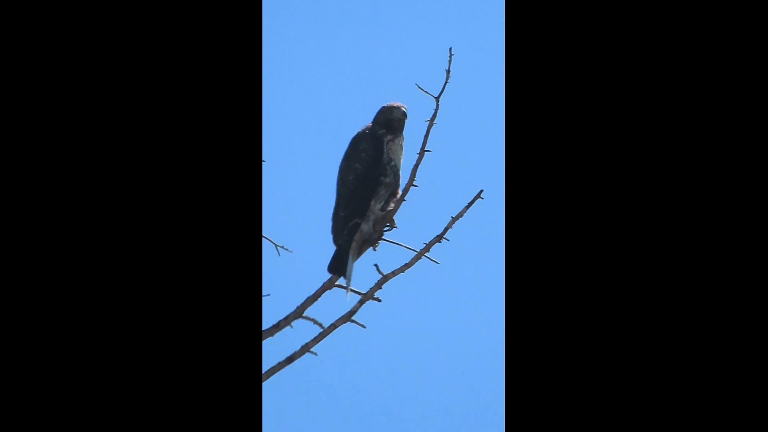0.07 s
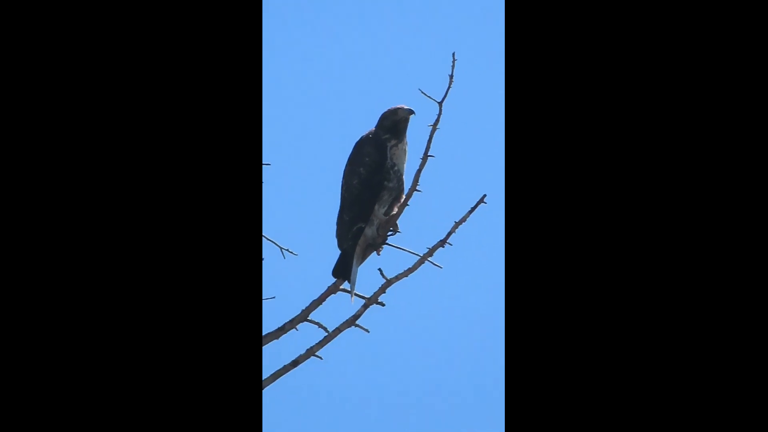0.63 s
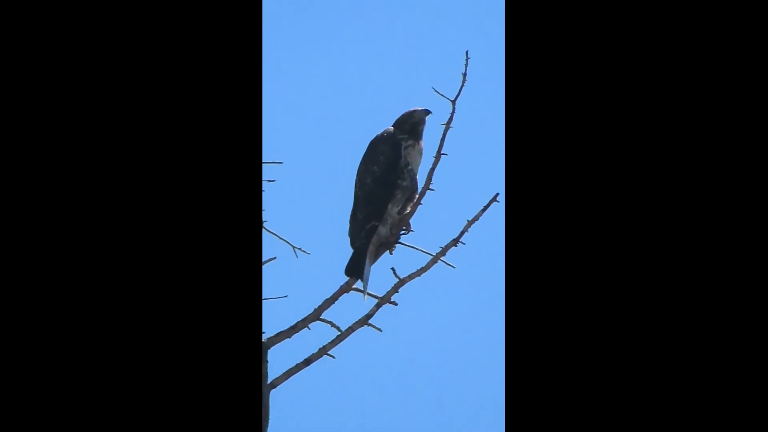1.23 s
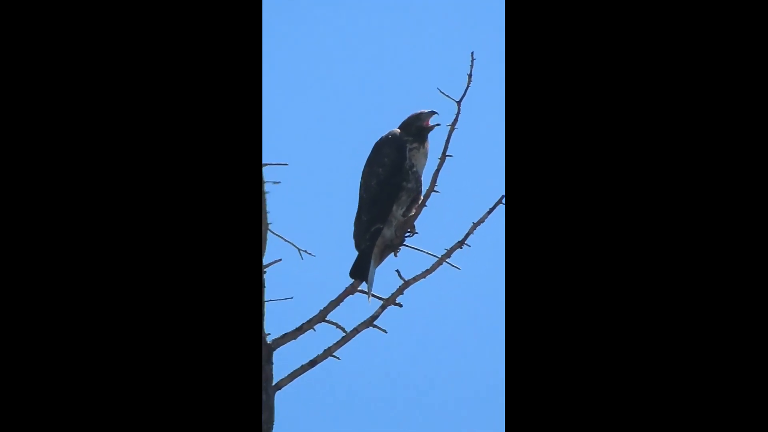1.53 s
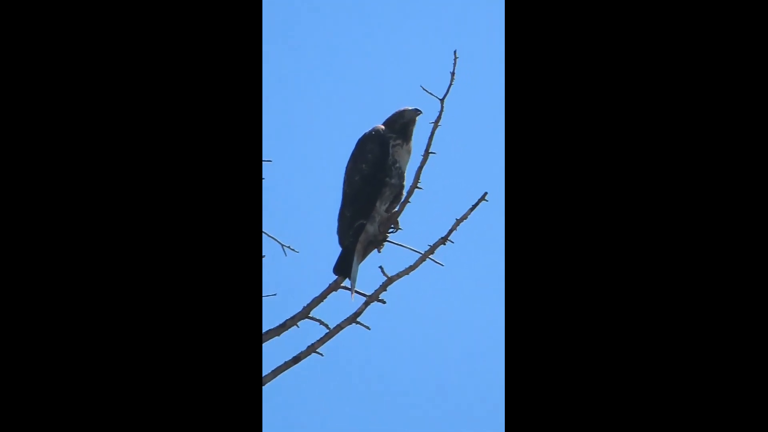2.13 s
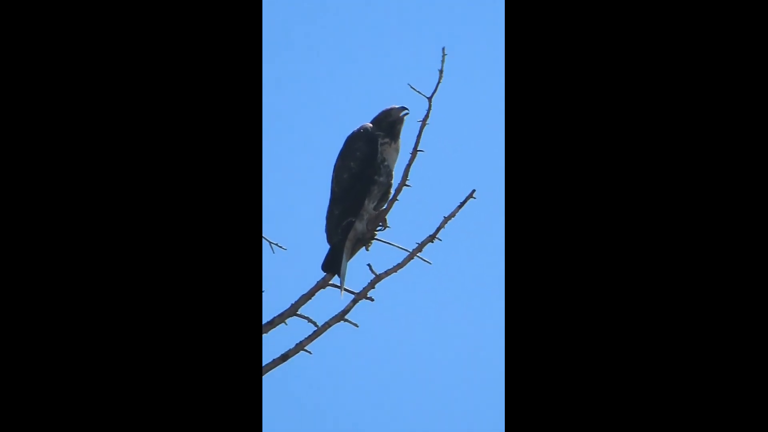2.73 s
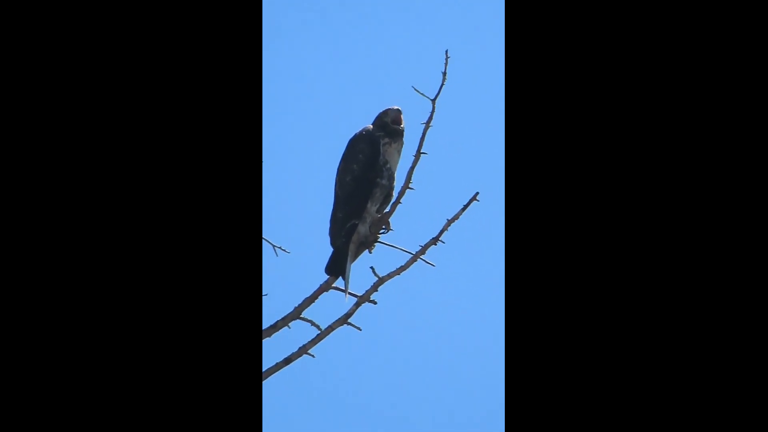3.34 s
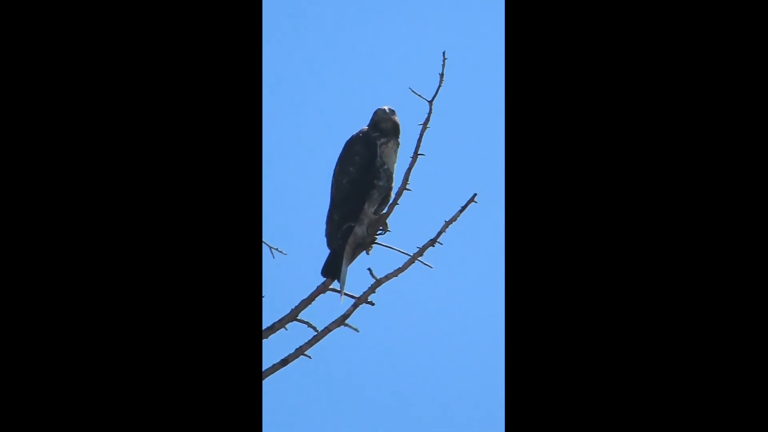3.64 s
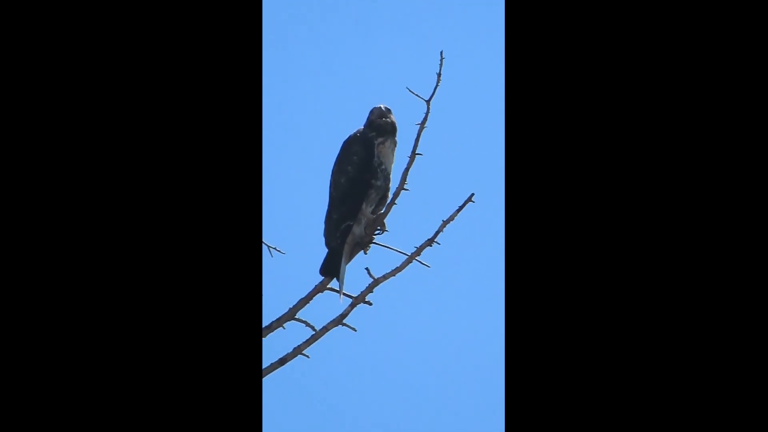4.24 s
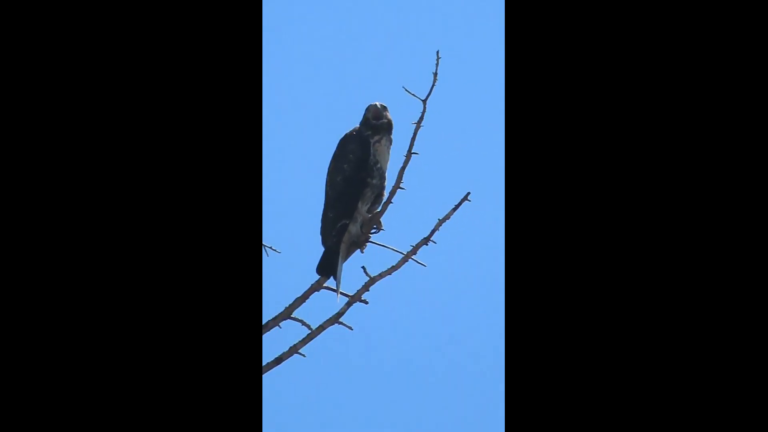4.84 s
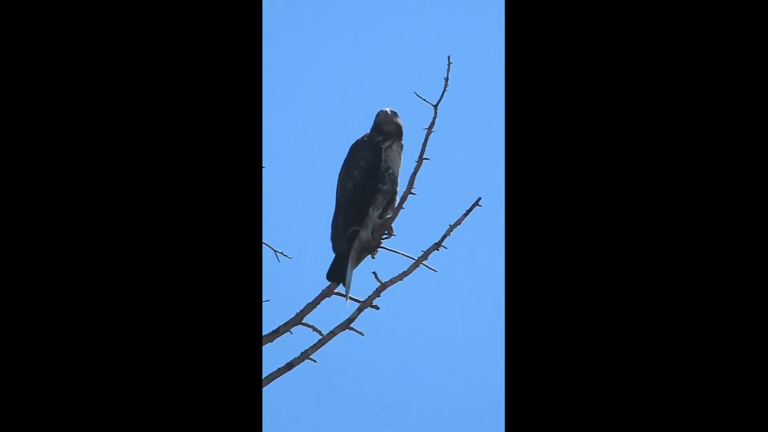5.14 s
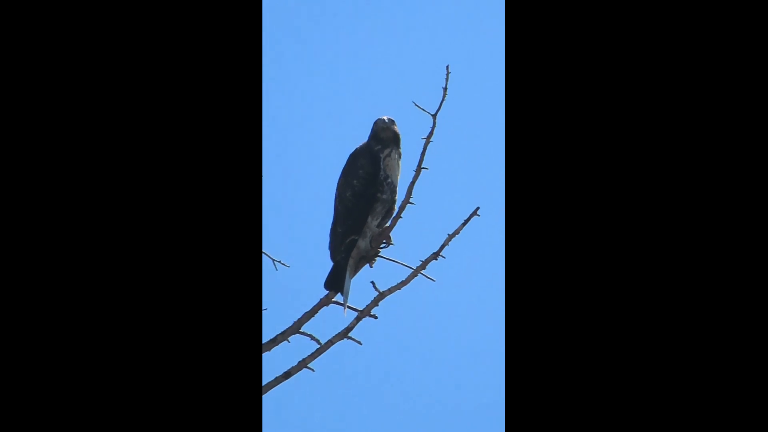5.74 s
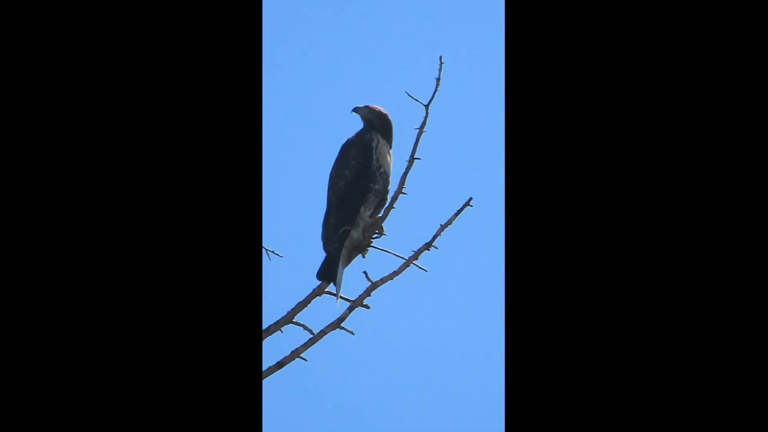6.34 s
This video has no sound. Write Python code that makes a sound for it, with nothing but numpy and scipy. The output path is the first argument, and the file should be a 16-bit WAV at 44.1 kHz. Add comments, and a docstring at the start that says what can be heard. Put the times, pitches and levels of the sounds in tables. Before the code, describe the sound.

Two young hawks trade high squeals and lower rising cries outdoors, while light wind rumbles and bumps the microphone.

```python
"""Light wind bumps the microphone, a small bird gives one thin far call, and two young hawks beg.
The near hawk squeals high; the other answers about an octave lower, over a quiet outdoor wash.
Their cries are whistles from the syrinx, most of them breaking from one register into the next,
and trees scatter them back. The wind is turbulence at the two microphone ports."""
import sys
import numpy as np
from scipy import signal
from scipy.fft import rfft, irfft
from scipy.io import wavfile
from scipy.ndimage import uniform_filter1d

SR = 44100
rng = np.random.default_rng(int(sys.argv[2]) if len(sys.argv) > 2 else 0)


def materialize(psi):
    """Save the field psi as 16-bit PCM at rate SR to the path in sys.argv[1].

    A 1-D psi becomes a single channel; in a 2-D psi each row is a channel.
    """
    bounded = np.clip(np.atleast_2d(psi).T, -1, 1)
    quanta = np.round(bounded * 32767).astype(np.int16)
    wavfile.write(sys.argv[1], SR, quanta)


N = 285768
CLEAN_DB = -48  # side tone of a clear voice, relative to its whistle


def high_hawk(run_up_ratio=.6, middle_hz=3148, yelp_ratio=.688, sag_s=.015):
    """The near hawk runs up, breaks into a middle register, again into its squeal, and ends on a yelp."""
    # the held top register, one contour per cry: time_s, pitch_hz, level_db
    squeals = [
        [(0.988, 3450, -59), (1.0, 3740, -54), (1.02, 3953, -46), (1.046, 4012, -45), (1.166, 3970, -37),
         (1.214, 4060, -45.5), (1.224, 4060, -38), (1.297, 4110, -42)],
        [(1.908, 4306, -41.5), (1.956, 4286, -46.5), (1.972, 4293, -37), (1.99, 4320, -45),
         (2.054, 4360, -41.5), (2.068, 4347, -42), (2.082, 4375, -56), (2.119, 4244, -39)],
        [(2.646, 4340, -47), (2.702, 4315, -43.5), (2.768, 4407, -40.5), (2.832, 4394, -36), (2.848, 4415, -53),
         (2.858, 4400, -37), (2.88, 4200, -47)],
        [(3.403, 4297, -38.5), (3.497, 4240, -41.5), (3.539, 4212, -50.5), (3.551, 4271, -37.5),
         (3.589, 4277, -35), (3.609, 4286, -42), (3.645, 4240, -37.5), (3.668, 4140, -39.5)],
        [(4.144, 4110, -44), (4.16, 4180, -38.5), (4.182, 4220, -38.5), (4.286, 4160, -33.5),
         (4.386, 4198, -36), (4.398, 4163, -32), (4.43, 4126, -41), (4.46, 4045, -41.5)],
        [(5.003, 4100, -42), (5.007, 4140, -39.5), (5.111, 4084, -34.5), (5.215, 4156, -35.5),
         (5.223, 4132, -39.5), (5.255, 4120, -39), (5.275, 4027, -37)],
    ]
    # into and out of each squeal: run_up_start_s, middle_start_s, lead_in_db, yelp_db, side_tone_db
    transitions = [(0, 0, -60, -45.5, -21.5), (1.812, 1.856, -39, -39.5, -7.5),
                   (2.552, 2.585, -37, -38, -13.5), (3.33, 3.363, -38.5, -39, -23),
                   (4.108, 4.139, -39, -45.5, -42), (4.93, 4.974, -40, -58, -45)]
    # overtones beam from the bill and grow as the bird faces the microphone: time_s, brightness_db
    facing = [(1.1, -4.5), (2.0, 0), (2.75, -3), (3.5, 4), (4.3, -2.5), (5.1, 0.5)]
    notes = []
    for squeal, (run_up, middle, lead_db, yelp_db, side_db) in zip(squeals, transitions):
        start, first_hz, _ = squeal[0]
        end, last_hz, last_db = squeal[-1]
        if run_up > 0:  # the first cry starts straight on the squeal
            notes.append(note(run_up, middle - run_up, run_up_ratio * first_hz, lead_db, scoop=.0387,
                              scoop_s=.022, climb=.125, bend=.032, bend_s=.006, soft_db=-17, swell_db=6.5))
            notes.append(note(middle, start - middle, middle_hz, lead_db - .5,
                              climb=.018, bend=.065, bend_s=.0037, swell_db=-3.5, release_db=-7))
        sag = (end + sag_s, last_hz * (1 - .018), last_db - 2.5)  # just before the squeal drops out
        notes.append([(*point, side_db) for point in [*squeal, sag]])
        notes.append(note(end + sag_s, .022, yelp_ratio * last_hz, yelp_db,
                          climb=-.039, bend=-.039, bend_s=.0094, release_db=-11.5))
    voice = whistles(notes, facing, side_ratio=3 / 5, jitter=.0021, shimmer_db=.7, side_rough=.74)
    placed = trees(voice, wet_db=-6.5, near_t60=.92, far_db=-11, far_t60=.91, echo_db=-6, spread=.29)
    return placed * gain_of([[-.2], [.1]])


def low_hawk(rasp_db=.5):
    """The other hawk's rising cry sags away when weak; pressed harder, it breaks into a higher register."""
    # one cry a row, the rising note and then the upper register (end 0 if the voice does not break):
    # start_s, end_s, top_hz, level_db, swell_db, upper_end_s, upper_base_hz, crest_rise_hz, upper_db
    cries = [(2.493, 2.863, 2144, -47.5, -2.5, 0, 0, 0, -60),
             (3.127, 3.384, 2264, -36.5, 12.5, 0, 0, -2, -60), (3.657, 3.907, 2302, -37.5, 6, 0, 0, 0, -60),
             (4.15, 4.332, 2373, -37, 7.5, 4.39, 2891, -42, -40.5),
             (4.647, 4.822, 2379, -36.5, 4, 5, 2867.5, 71, -42.5),
             (5.171, 5.294, 2423, -35.5, 3, 5.5, 2834, 103.5, -34.5),
             (5.694, 5.794, 2446, -34.5, 3, 6, 2855.5, 160.5, -34),
             (6.234, 6.343, 2435, -38.5, 0, 6.5, 2815, 184, -39)]
    # the bill turning toward and away from the microphone: time_s, brightness_db
    facing = [(3.3, -2.5), (4.75, -0.99), (5.8, -1.7)]
    notes = []
    for start, end, hz, db, swell_db, upper_end, base_hz, crest_hz, upper_db in cries:
        if upper_end > end:
            notes.append(note(start, end - start, hz, db, scoop=.135, scoop_s=.026, climb=.06, bend=.031,
                              bend_s=.0096, soft_db=-29.5, swell_db=swell_db, rasp_db=rasp_db))
            notes.append(upper_register(end, upper_end, base_hz, crest_hz, upper_db))
        else:
            notes.append(note(start, end - start, hz, db, scoop=.115, scoop_s=.031, climb=.07,
                              bend=-.12, bend_s=.01866, soft_db=-16, swell_db=swell_db,
                              release_db=-15.5, rasp_db=rasp_db))
    voice = whistles(notes, facing, side_ratio=3 / 2, jitter=.0033, shimmer_db=1.54, side_rough=.36)
    placed = trees(voice, wet_db=-6.5, near_t60=.47, far_db=-5.5, far_t60=1.23, echo_db=-2, spread=.22)
    return placed * gain_of([[-.5], [.4]])


def upper_register(start, end, base_hz, crest_hz, db, crest_db=-7, fall_s=.034, fall_hz=270, fall_db=-5.5):
    """The upper note starts level, arches, then slides down; a ground reflection dims it near its crest."""
    s = np.linspace(start, end, num=80)
    through = (s - start) / (end - start)
    crest = np.exp(-((through - .64) / .2) ** 2)
    fall = np.maximum(1 - (end - s) / fall_s, 0)
    pitch = base_hz + crest_hz * crest - fall_hz * fall
    level = db + crest_db * crest + fall_db * fall ** 2
    return np.transpose([s, pitch, level, np.full_like(s, CLEAN_DB)])


def note(start, length, hz, db, scoop=0, scoop_s=.02, climb=0, bend=0, bend_s=.01,
         soft_db=0, swell_db=0, release_db=0, rasp_db=CLEAN_DB):
    """One register: the pitch scoops in, climbs with the pressure and bends at the end, by shares of hz."""
    t = np.linspace(0, length, num=80)
    through = t / length
    onset, ending = np.exp(-t / scoop_s), np.exp((t - length) / bend_s)
    pitch = hz * (1 - scoop * onset - climb * (1 - through) + bend * ending)
    level = db + soft_db * onset ** 2 + swell_db * (through - .5) + release_db * ending
    side_db = np.maximum(rasp_db - 580 * t, CLEAN_DB)  # a raspy attack clears at 580 dB a second
    return np.transpose([start + t, pitch, level, side_db])


def whistles(notes, facing, side_ratio, jitter, shimmer_db, side_rough, press_db=3, patchy_db=3):
    """The syrinx sings a nearly pure tone with faint harmonics and a rough side tone that tracks it."""
    # higher whistles are purer: pitch_hz, step_per_harmonic_db
    purity = [(1800, -9.5), (2200, -12), (2500, -20), (3000, -24.5), (4200, -24.5)]
    # the throat damps overtones beyond the second harmonic: gain_db for harmonics 1 to 4
    throat = [0, 1, -4, -5.5]
    out = np.zeros(N)
    waver, flutter, slip, patches = (wander(N, hz) for hz in (260, 110, 140, 24))
    for contour in notes:  # rows of time_s, pitch_hz, level_db, side_tone_db
        s, *columns = np.transpose(contour)
        at = np.arange(max(round(s[0] * SR), 0), min(round(s[-1] * SR), N))
        hz, db, side_db = (np.interp(at / SR, s, column) for column in columns)
        phase = 2 * np.pi * np.cumsum(hz * (1 + jitter * waver[at])) / SR
        # brighter while the bird presses the pitch up, duller as it lets go
        pitch_slope = np.gradient(np.log(hz)) * SR
        pressing = np.tanh(uniform_filter1d(pitch_slope, size=600) / 2)
        facing_db = np.interp(at / SR, *np.transpose(facing))
        rolloff = gain_of(curve_at(purity, hz) + facing_db + press_db * pressing)
        tone = sum(gain_of(trim) * rolloff ** k * np.sin((k + 1) * phase) for k, trim in enumerate(throat))
        # the side tone slips in and out of step and beats with the whistle, adding their sum tone
        side_phase = side_ratio * phase + side_rough * slip[at]
        side_tone = np.sin(side_phase) + gain_of(-23.5) * np.sin(side_phase + phase)
        tone += gain_of(side_db + patchy_db * patches[at]) * side_tone
        t = np.arange(len(at)) / SR
        edge = np.clip(np.minimum(t / .003, t[::-1] / .005), 0, 1)
        fade = np.sin(np.pi / 2 * edge) ** 2
        add(out, s[0], np.sqrt(2) * gain_of(db + shimmer_db * flutter[at]) * fade * tone)
    return out


def small_bird():
    """One thin, slightly falling whistle from far off in the trees."""
    # the bill holds one direction: time_s, brightness_db
    facing = [(0, -6)]
    call = note(start=.015, length=.2, hz=6900, db=-73, scoop=-.0194, climb=-.06, swell_db=-4)
    voice = whistles([call], facing, side_ratio=1 / 2, jitter=.012, shimmer_db=2, side_rough=.3)
    return trees(voice, wet_db=-1, near_t60=.62, far_db=-20, far_t60=.9, echo_db=-1.5, spread=.6)


def trees(voice, wet_db, near_t60, far_db, far_t60, echo_db, spread):
    """A few distinct echoes, a tail from near foliage and a fainter one from the woods behind."""
    # slaps off single trunks and the ground: delay_s, relative_level_db
    echoes = [(0.021, -21.5), (0.046, -23.5), (.072, -13), (.103, -44), (0.137, -26.5)]
    t = np.arange(SR) / SR
    scatter = rng.standard_normal((2, SR)) * (rng.random((2, SR)) < 1500 / SR)  # about 1500 a second
    decay = np.hypot(gain_of(-60 * t / near_t60), gain_of(far_db - 60 * t / far_t60))
    mid, side = scatter * decay * (1 - np.exp(-t / .0032))
    tail = np.array([mid + spread * side, mid - spread * side])
    tail *= gain_of(wet_db) / np.linalg.norm(tail[0])
    for delay, db in echoes:
        tail[:, round(delay * SR)] += gain_of(db + echo_db)
    return voice + signal.fftconvolve(voice[None], tail, axes=1)[:, :N]


def buffets(glide=.208, port_lag_s=.00064, rough=.38):
    """Each eddy thumps: a pressure swing of a few quickening, steep-sided cycles, unlike at each port."""
    # eddies hitting the microphone:
    # centre_s, peak_db, ring_hz, half_length_s, left_minus_right_db, steepening_db
    eddies = [(0.047, -27.5, 201.2, 0.012, 5, -10.5), (.213, -28, 210, .006, 1, -21),
              (.285, -23, 201, 0.0052, -5, -15), (0.347, -28, 230, 0.0076, -3, -17),
              (0.373, -23, 164, 0.0061, 0, -21), (0.509, -17.5, 143.7, 0.0057, -1.5, -8),
              (0.903, -34, 75, .01, 0, -15), (1.171, -27, 60.3, 0.021, 0, -5),
              (1.189, -24.5, 218.2, .008, 7, -9.5), (2.092, -15.5, 243.4, .007, -5.5, -9),
              (2.346, -31, 195, 0.0059, -4.5, -11), (2.446, -26.5, 66, 0.011, -1, -11),
              (2.693, -29, 114, 0.0055, 0, -15), (2.811, -28.5, 86, 0.02, 1, -5),
              (2.89, -27, 102, 0.017, 4, -15), (3.5, -23.5, 130, .006, -3, -9),
              (3.546, -28, 109, .007, 6, -20), (3.595, -20.5, 131.7, 0.0074, 6, -10),
              (3.793, -16.5, 99.4, 0.00551, -2, -13), (4.25, -12.5, 109.1, 0.012, -2, -13),
              (4.317, -15, 87.6, 0.0093, 4, -9), (4.354, -14, 173.6, 0.011, 0.5, -27),
              (5.258, -31, 74, .01, -5, -12), (5.765, -29, 151, .008, -0.5, -18),
              (5.814, -26.5, 93.5, .012, 2, -12.5), (6.339, -24, 86.8, 0.0083, 0, -12)]
    out, grain = np.zeros((2, N)), wander(N, 191)
    for s, db, hz, half_s, pan_db, steep_db in eddies:
        turn, heading = rng.random(2)
        u = np.arange(-5 * half_s, 5 * half_s, 1 / SR) / half_s  # half lengths from the centre
        phase = 2 * np.pi * (np.cumsum(hz * np.exp(glide * np.tanh(u))) / SR + turn)
        shape = signal.windows.tukey(len(u), .5) / np.cosh(np.pi / 2 * u)
        swell = gain_of(db) * shape * (1 + rough * grain[round(s * SR):][:len(u)])
        port_phase = np.sign(heading - .5) * 2 * np.pi * hz * port_lag_s  # it reaches one port first
        start = s + u[0] * half_s
        skip = max(round(-start * SR), 0)
        for port, sign in zip(out, (1, -1)):
            swing = phase + sign * port_phase
            steepened = np.sin(swing + 2 * gain_of(steep_db) * shape * np.sin(swing))
            thump = swell * steepened * gain_of(sign * pan_db / 2)
            add(port, start, thump[skip:])
    return out


def wind(lumpy_db=1):
    """Turbulence at the microphone ports rumbles and swells with the breeze."""
    # strength of the breeze, capped below: time_s, level_db
    breeze = [(0.0, -45), (0.05, -40.5), (0.43, -43), (0.5, -24), (0.56, -44), (1.84, -51.5), (2.06, -39.5),
              (2.54, -40), (2.65, -51), (2.89, -31.5), (3.07, -49.5), (3.59, -37.5), (3.63, -42.5),
              (3.79, -37.5), (4.0, -46), (4.2, -42), (4.24, -24), (4.33, -33), (4.55, -59), (5.03, -38),
              (5.05, -50), (5.27, -41), (5.31, -52), (5.74, -43), (5.81, -34), (5.87, -48), (6.04, -51.5),
              (6.08, -38), (6.26, -54), (6.33, -35.5), (6.44, -47), (6.48, -36)]
    # colour of the turbulence: frequency_hz, density_db
    spectrum = [(12, 0.5), (35, 0), (80, 3.5), (130, -4.5), (200, -13), (300, -27), (500, -38.5),
                (1000, -70)]
    rumble = noise_pair(spectrum, likeness=[(30, 1), (80, .93), (160, .44), (400, .28)])
    breeze_db = np.minimum(np.interp(np.arange(N) / SR, *np.transpose(breeze)), -35.5)
    return rumble * gain_of(breeze_db + 2.5 + lumpy_db * wander(N, 14))


def outdoor_wash(level_db=-48.5):
    """The far wash of the open air: a quiet, steady bed, centred in the bass and wide above it."""
    # colour of the wash: frequency_hz, density_db
    spectrum = [(59, -38.5), (100, -2.5), (253, -11), (420, -10), (588, -16), (790, -17.5), (976, -16),
                (1280, -21), (2860, -26), (3460, -27), (4270, -29.5), (4950, -31), (10400, -41.5),
                (13600, -48), (15500, -66)]
    # how alike left and right are: frequency_hz, correlation
    likeness = [(60, 0.93), (250, 0.12), (600, 0.19), (1500, 0.33), (4000, 0.31), (12000, 0.23)]
    return gain_of(level_db) * noise_pair(spectrum, likeness)


def noise_pair(spectrum, likeness):
    """Coloured noise at two microphone ports that share part of it."""
    hz = np.fft.rfftfreq(N, 1 / SR)
    mid, side = rfft(rng.standard_normal((2, N))) * gain_of(curve_at(spectrum, hz))
    shared = np.clip(curve_at(likeness, hz), 0, .999)
    mid, side = mid * np.sqrt(1 + shared), side * np.sqrt(1 - shared)
    return unit_rms(irfft(np.array([mid + side, mid - side]), N))


def wander(size, hz):
    """Smooth random drift of rms 1, moving up to about hz."""
    f = np.fft.rfftfreq(N, 1 / SR)
    return unit_rms(irfft(rfft(rng.standard_normal(N)) / (1 + (f / hz) ** 2) ** 2, N))[:size]


def gain_of(db):
    """Decibels to amplitude."""
    return 10 ** (np.asarray(db) / 20)


def unit_rms(x):
    """Scales to rms 1."""
    return x / np.sqrt(np.mean(x ** 2) + 1e-20)


def curve_at(points, hz):
    """Reads a table on a log-frequency axis."""
    f, value = np.transpose(points)
    return np.interp(np.log(hz + 1), np.log(f + 1), value)


def add(mix, s, sound):
    """Mixes a sound in at time s."""
    part = mix[max(round(s * SR), 0):][:len(sound)]
    part += sound[:len(part)]


def scene():
    """Three birds, each at its own distance, over wind and the far wash."""
    return high_hawk() + low_hawk() + small_bird() + buffets() + wind() + outdoor_wash()


def record(dry, edge_hz=15400):
    """A steep treble cut, with a brief fade at both ends."""
    faded = dry * signal.windows.tukey(N, .002)
    lowpass = signal.firwin(511, edge_hz, window=("kaiser", 9), fs=SR)
    return signal.oaconvolve(faded, lowpass[None], "same")


dry = scene()
out = record(dry)
materialize(out)
```